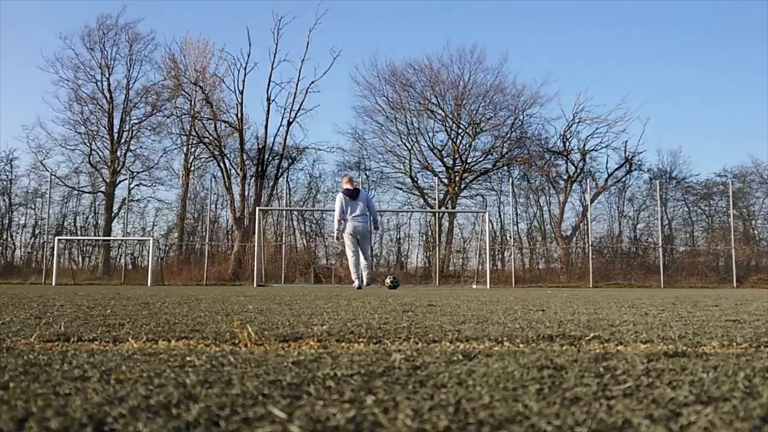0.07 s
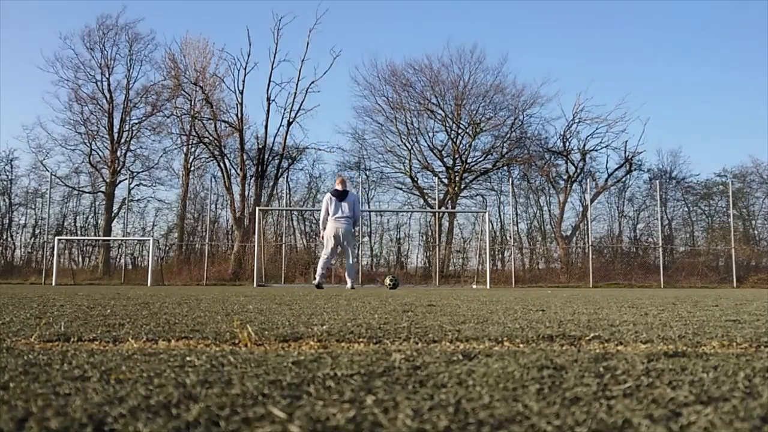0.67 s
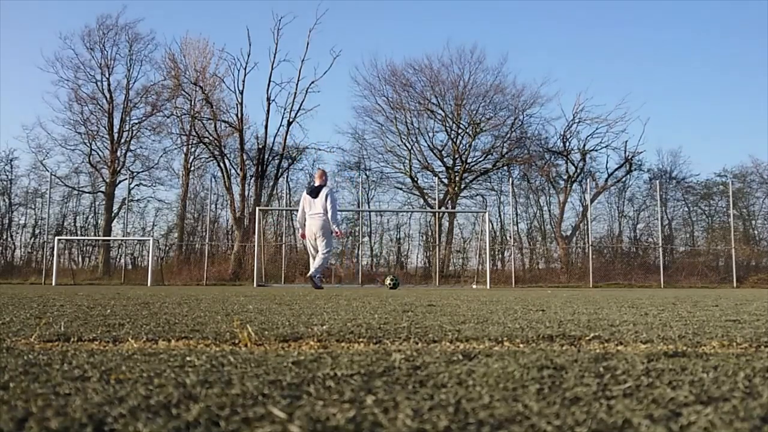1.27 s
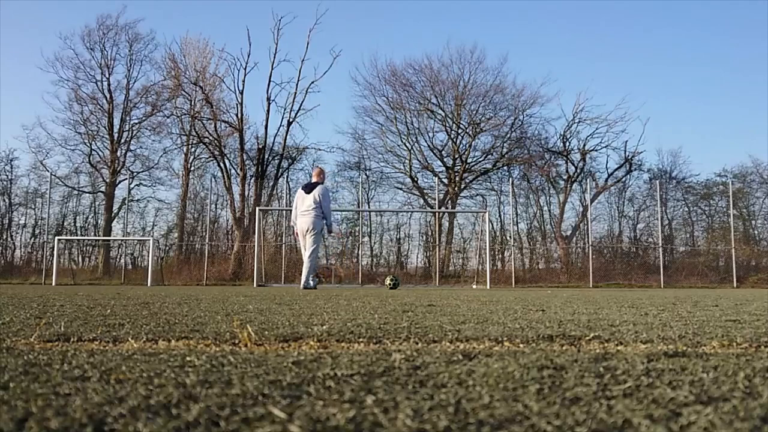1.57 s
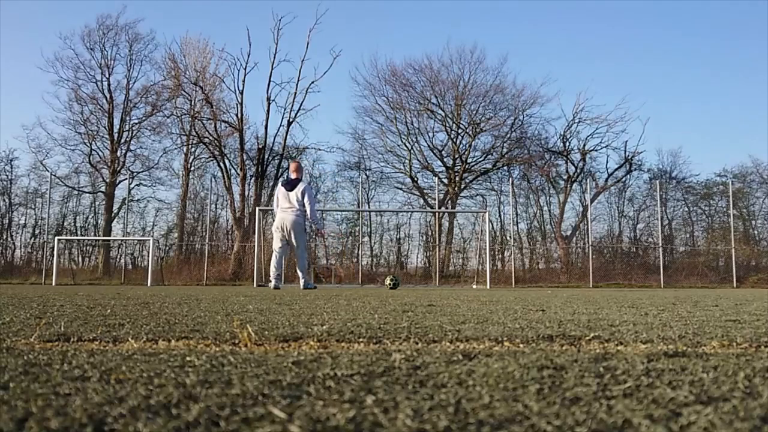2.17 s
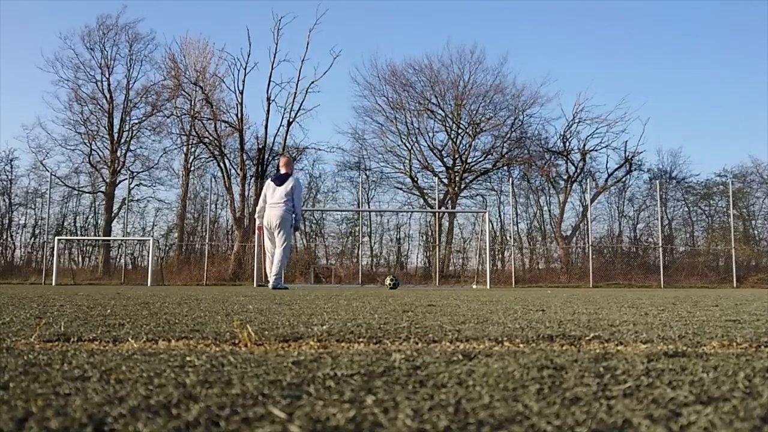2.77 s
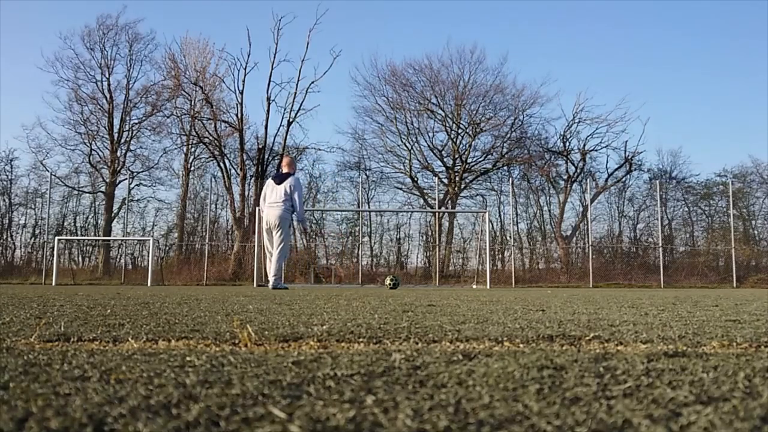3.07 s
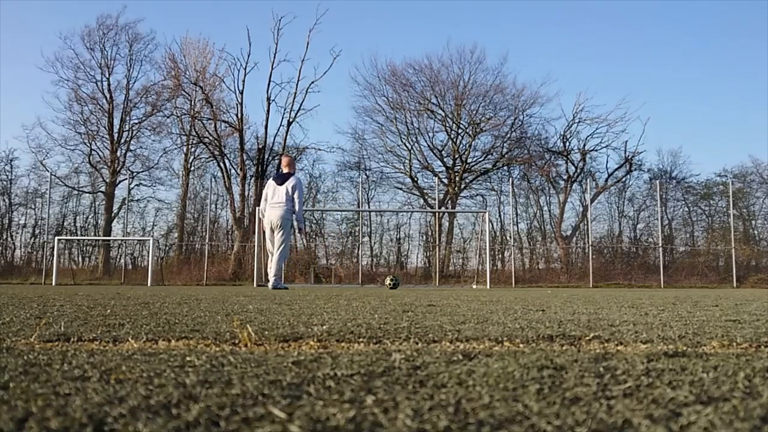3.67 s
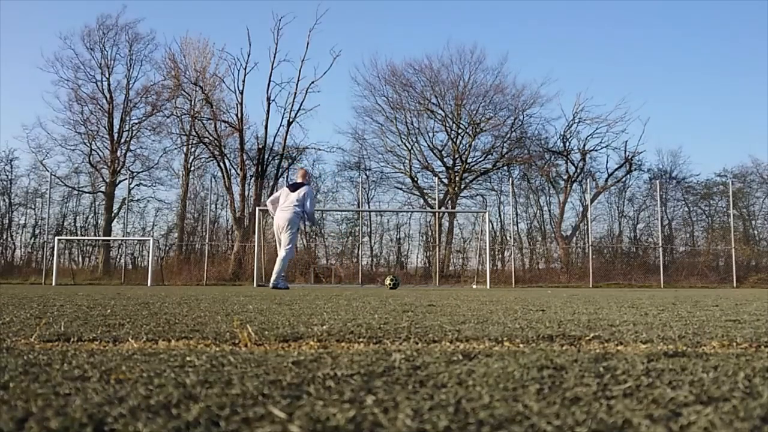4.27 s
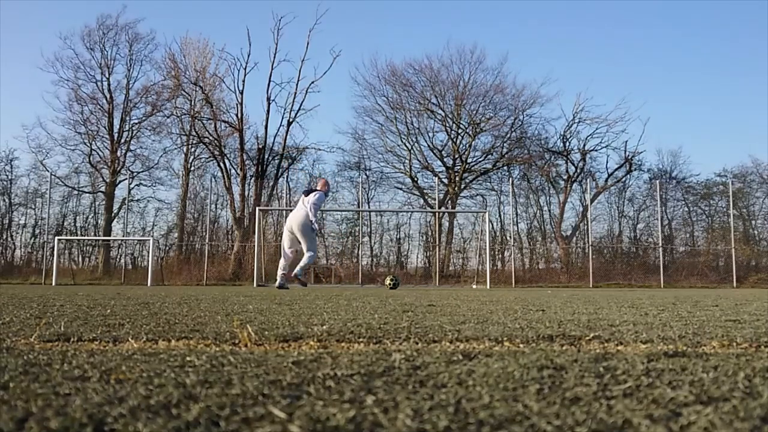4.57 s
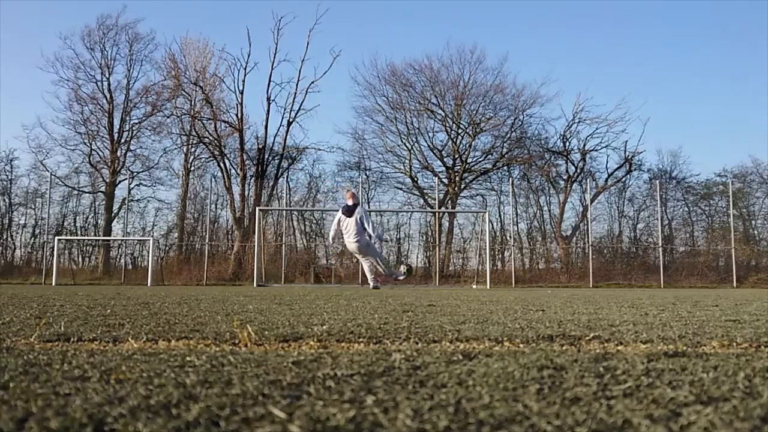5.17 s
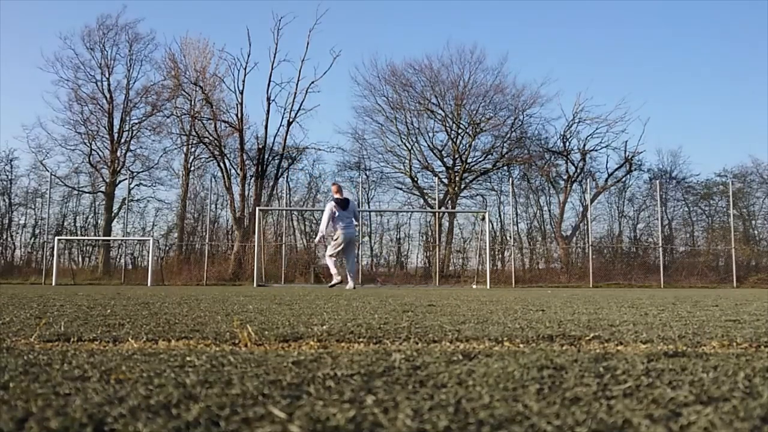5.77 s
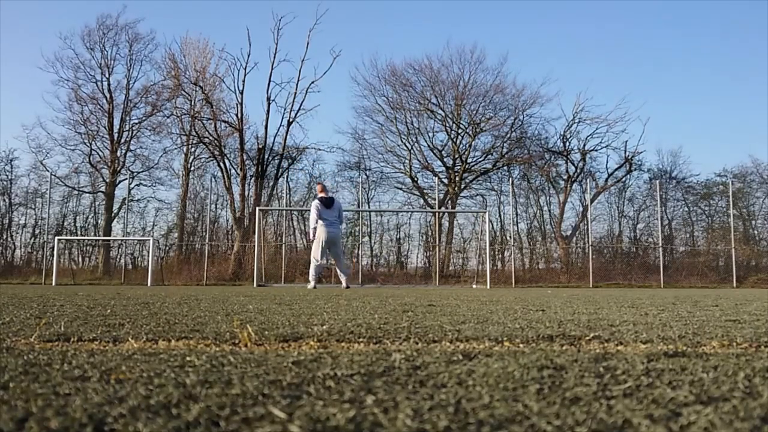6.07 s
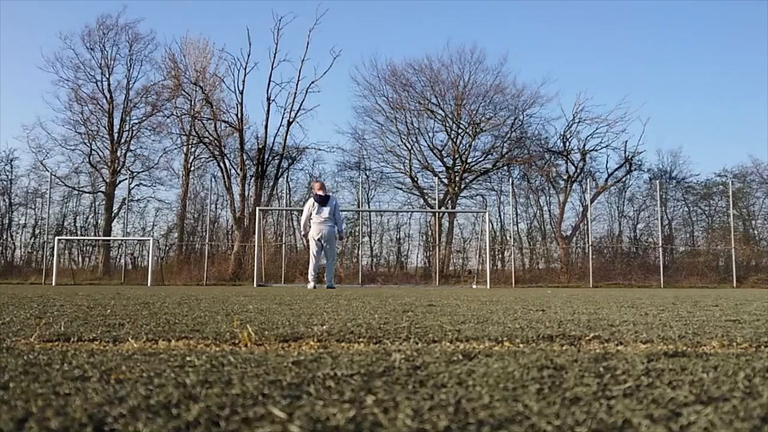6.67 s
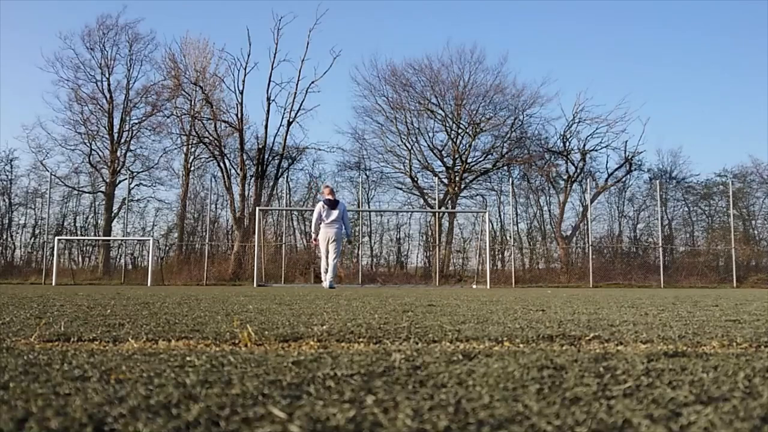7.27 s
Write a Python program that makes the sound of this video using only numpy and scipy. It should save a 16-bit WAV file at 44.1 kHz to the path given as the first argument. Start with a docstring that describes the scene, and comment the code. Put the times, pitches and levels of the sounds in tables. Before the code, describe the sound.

A low wind rumble on a microphone near the ground runs throughout, swelling in mild gusts over an open grass pitch. Behind it lie a soft distant rush and the faint hum and wavering whine of machinery. At about 2.9 seconds a football is kicked with a solid, slapping thump, the loudest sound, followed by a quick, quiet echo. A boot knocks softly on the turf at 3.2 seconds. Around 3.5 seconds the ball hits a wire fence with a double thud: the mesh rattles, the steel frame clanks and the taut wires ring for about half a second. Between 3.7 and 4.1 seconds a small bird very faintly whistles four high, falling notes. The ball drops and bounces softly at about 4.3, 4.8 and 5.2 seconds, each bounce weaker. Wind and distant machinery continue until the end, a little past 7 seconds.

```python
"""Wind rumbles on a camera low on a grass pitch, over a distant rush and the hum and whine of machinery.
A football is kicked: it flexes with a thump, its skin slaps, and the edge of the pitch throws it back.
A boot knocks on the turf, then the ball hits a wire fence, drops and bounces. The steel frame clanks,
the wire crossings rattle and the taut wires ring on, while a small bird whistles four falling notes."""
import sys
import numpy as np
from scipy import signal
from scipy.fft import rfft, irfft
from scipy.io import wavfile

SR = 44100
rng = np.random.default_rng(int(sys.argv[2]) if len(sys.argv) > 2 else 0)


def log_audio(samples):
    """Write samples as a 16-bit WAV file to the path given in sys.argv[1]."""
    # one column per channel
    frames = np.atleast_2d(samples).T
    # limit to full scale, then quantise
    limited = np.clip(frames, -1, 1)
    pcm = np.round(limited * 32767).astype(np.int16)
    wavfile.write(sys.argv[1], SR, pcm)


N = 323253
T = np.arange(N) / SR
HZ = np.fft.rfftfreq(N, 1 / SR)
PAN = np.array([[.5], [-.5]])  # splits a pan_db, left minus right, between the channels

# gusts on the microphone ports: start_s, level_db, length_s, pan_db
WIND_GUSTS = [(0, -52.5, 1.45, 3.5), (1.196, -50, 2.4, 0.5), (3.315, -54, 1.2, 2.5), (6.02, -56, 0.72, -23)]
# tone of the wind rumble: freq_hz, gain_db
WIND_EQ = [(22, -49), (32, -25.5), (45, -8), (60, 4), (85, -2), (120, -9), (200, -37.5), (400, -83.5)]
# tone of the distant rush: freq_hz, gain_db
RUSH_EQ = [(50, -26), (90, -13.5), (125, 3.5), (160, -1.5), (210, 2.5), (270, -4), (320, -4), (420, -8),
           (500, -8.5), (620, -10), (800, -18), (1150, -28), (1600, -38.5), (2400, -57)]
# stereo image of the rush: freq_hz, correlation
RUSH_IMAGE = [(60, 0.86), (130, 0.99), (290, 0.94), (640, 1), (1400, 0.49), (2400, 0.061)]
# drone of far-off machinery: pitch_hz, width_hz, level_db
HUM_BANDS = [(63.5, 4.4, -63), (299.6, 9.9, -66.5)]
# partials of the machine's whine: pitch_hz, gain_db
WHINE_PARTIALS = [(463, 2), (862, -14)]
# the air carries the whine over: peak_s, level_db, half_length_s
SWELLS = [(0.203, -69.5, 0.13), (1.47, -66.5, 0.15), (1.992, -67, 0.073), (4.203, -66, 0.62),
          (4.775, -63.5, 0.14), (5.883, -64, 0.28), (6.545, -70, 0.16)]
# balance of the two microphone ports: freq_hz, pan_db
PORT_PAN = [(60, -3), (110, -3.5), (200, -5), (700, -5), (1290, -7.5), (2380, -3.5), (4400, 2.45),
            (8000, -4), (14000, 2.83)]
# the tail of one bird note, then the four-note call: start_s, base_pitch_hz, slide_depth, bend, level_db
BIRD_NOTES = [(-.04, 6170, .27, 2, -76.5), (3.686, 7450, .19, 1, -69.5), (3.803, 7330, .25, 1.2, -71),
              (3.919, 7000, .28, 1.6, -71.5), (4.047, 6300, .28, 3.6, -75.5)]
# the ball on boot, fence and turf: start_s, level_db, contact_s, slap_db, scuff_db, crack_db
BALL_HITS = [(2.8635, .3, .00852, -5.5, -54, -47), (3.5098, -26, .0084, -7, -37, -29),
             (3.5638, -8.3, .0096, -16, -35, -38), (3.7064, -24, 0.0095, -25, -36, -34),
             (4.2552, -24.5, 0.01, -9.5, -41, -46), (4.8495, -28.5, .008, -13, -50, -50),
             (5.178, -33, .0062, -13, -50, -50)]
# tone of the ball's scuff: freq_hz, gain_db
SCUFF_EQ = [(300, 20), (1200, 8.5), (2500, -13), (4400, -2), (5500, -24), (9000, -12), (15000, -27)]
# tone of the skin's crack at first touch: freq_hz, gain_db
CRACK_EQ = [(600, 11.5), (1500, -3), (2600, -3.5), (4300, -8.5), (5400, -20), (12000, -18)]
# the kick returning from the edge of the pitch: delay_s, gain_db
KICK_ECHOES = [(0.1178, -20), (0.1329, -24)]
# tone of those echoes: freq_hz, gain_db
ECHO_EQ = [(50, -28), (100, -11), (155, 2), (260, -12), (600, -12.5), (1300, 11), (5000, -5)]
# three tiny ticks during the kick, then sharp snaps at the fence hits: start_s, level_db, fade_s
TICK_BURSTS = [(2.8683, -52, .0005), (2.8734, -54, .0007), (2.8763, -54, .0005), (3.51, -53, .0012),
               (3.5642, -43, .0012), (3.573, -45, .0012), (3.709, -55, .002)]
# tone of the ticks: freq_hz, gain_db
TICK_EQ = [(2000, -22.5), (4400, 8), (5600, -5), (8000, -2), (11500, -7.5), (15000, -16)]
# faint crackly rustles, the first with the kick's echo: start_s, level_db, fade_s
RUSTLE_BURSTS = [(2.975, -74.5, 0.14), (3.2, -85, 1), (3.85, -84, 0.66), (4.26, -79, 0.22),
                 (4.435, -82, 0.04), (4.85, -82, 0.075)]
# tone of the rustles: freq_hz, gain_db
RUSTLE_EQ = [(500, 1.5), (1200, 3.5), (2200, -7), (3500, -6.5), (4600, -3.5), (5400, -17), (7500, -13.5),
             (14000, -25)]
# a boot on the turf: start_s, level_db, pitch_hz
BOOT_KNOCKS = [(3.2318, -30, 380), (3.2803, -45, 533)]
# jolts of the fence: start_s, rattle_db, fade_s, jingle_db
FENCE_JOLTS = [(3.5099, -35, 0.002, -62), (3.515, -49, 0.03, -66), (3.5425, -39.5, 0.0051, -64),
               (3.555, -44, 0.0083, -67), (3.5622, -36, 0.004, -52), (3.5645, -35.5, 0.17, -60),
               (3.5728, -41, 0.0074, -48), (3.578, -50, .04, -49), (3.68, -54, .04, -58),
               (3.698, -48.5, .065, -75)]
# tone of the mesh rattle: freq_hz, gain_db
RATTLE_EQ = [(35, -43), (60, -1), (91, -1), (298, -13), (327, -18.5), (376, -9), (443, -14), (521, -18),
             (931, -20), (1200, -26), (1500, -26.5), (3840, -38), (4630, -37), (5320, -43), (7030, -45),
             (15500, -57)]
# stereo image of the rattle: freq_hz, correlation
RATTLE_IMAGE = [(130, 0.95), (640, 1), (1400, 0.71), (3100, 0), (7000, 0)]
# tone of the jingling wire crossings: freq_hz, gain_db
JINGLE_EQ = [(1500, -12), (3500, 4.5), (4500, 8), (5500, -11), (7000, -1), (8500, -7), (11500, -6),
             (13500, -21)]
# the ball drives the mesh against its frame: start_s, level_db
FRAME_HITS = [(3.51, -46), (3.5642, -40), (3.5728, -36), (3.601, -45), (3.648, -48), (3.7095, -48)]
# resonances of the steel frame: pitch_hz, gain_db, t60_s
FRAME_MODES = [(592, -5, .06), (1020, -2, .035), (1190, -1, .04), (1310, -9, .03), (1930, -15, .04),
               (4060, -18, .04), (4370, -13, .04), (4640, -17, .05)]
# the ball presses into the mesh, which then swings back: start_s, level_db
MESH_PUSHES = [(3.5635, -40), (3.695, -58)]
# resonances of the taut wires: pitch_hz, gain_db, t60_s
WIRE_MODES = [(296, 6, .3), (372, 0, .7), (383, -7, .7), (497, -9, 1.1), (533, 1, .5), (605, -7, .5),
              (635, -6, .45), (670, -8, .6), (694, -9, .5), (882, -14, .8), (912, -13, .7), (957, -10, .7),
              (1066, -12, .7), (1102, -10, .6), (1168, -10, .5), (1204, -10, .5), (1296, -13.5, .5),
              (1329, -13, .5), (1565, -19, .8), (1647, -20, .7), (1782, -21, .6), (1950, -16, .45),
              (2026, -20.5, .5), (2230, -19, .4), (2342, -23, .5), (2573, -20, .35), (2859, -25, .45),
              (3214, -26, .45), (3601, -25, .4), (4126, -21, .35), (4177, -22, .35), (4447, -23, .35),
              (4597, -21, .4)]
# loose wires as the fence settles: start_s, level_db, pitch_hz, width_hz, fade_s
WIRE_CLINKS = [(3.678, -60.5, 4710, 110, .035), (3.702, -51, 900, 40, .04), (3.762, -71, 4300, 120, .012),
               (3.765, -78, 4680, 110, .06), (3.801, -47, 382, 120, .01), (3.858, -72, 1572, 24, .065),
               (3.975, -83, 1572, 24, .05), (4.318, -89, 4480, 420, .04), (4.438, -82, 4660, 300, 0.03),
               (4.51, -86, 4520, 250, 0.031)]
# tone of the camera's hiss: freq_hz, gain_db
HISS_EQ = [(1200, -0.5), (2000, 3), (4400, 0.5), (5400, -11), (7000, -6.5), (10000, -0.5), (12600, 0.5),
           (13200, -18), (15500, -7)]


def undb(db):
    """Decibels to amplitude."""
    return 10 ** (np.asarray(db) / 20)


def unit(x):
    """Scale to rms 1."""
    return x / np.sqrt(np.mean(x ** 2))


def curve(points):
    """Join (freq_hz, value) points on a log-frequency axis."""
    hz, value = np.transpose(points)
    return np.interp(np.log(HZ + 1), np.log(hz), value)


def eq(x, points):
    """Filter by a (freq_hz, gain_db) curve."""
    return irfft(rfft(x) * undb(curve(points)), N)


def spread(pair, image):
    """Blend two unrelated signals into left and right, with the image's correlation at each frequency."""
    correlation = np.clip(curve(image), -1, 1)
    mid, side = rfft(pair) * np.sqrt([1 + correlation, 1 - correlation])
    return irfft(np.array([mid + side, mid - side]), N) / 2


def drift(rate_hz):
    """Smooth random modulation, rms 1."""
    return unit(irfft(rfft(rng.standard_normal(N)) * np.exp(-(HZ / rate_hz) ** 2), N))


def noise_band(hz, width_hz):
    """Noise ringing in one narrow resonance, rms 1."""
    return unit(irfft(rfft(rng.standard_normal(N)) / (1 + (2 * (HZ - hz) / width_hz) ** 2), N))


def since(start_s):
    """Time since the start, zero before it."""
    return np.maximum(T - start_s, 0)


def swell(t, rise_s, sharp):
    """Envelope that grows to 1 at the rise time, then dies away."""
    u = t / rise_s
    return (u * np.exp(1 - u)) ** sharp


def ping(t, hz, rise_s, sharp):
    """A heavily damped vibration of a few cycles."""
    return np.sin(2 * np.pi * hz * t) * swell(t, rise_s, sharp)


def bursts(rows, hold):
    """Envelope of hard attacks; a higher hold gives each a flatter top and a steeper fade."""
    return sum(undb(db) * np.minimum(since(start) / .00064, 1) * np.exp(-(since(start) / fade) ** hold)
               for start, db, fade in rows)


def clicks(per_s, scatter_db):
    """Two unrelated streams of tiny clicks of uneven size."""
    size = undb(scatter_db * np.minimum(rng.exponential(size=(2, N)), 4))
    polarity = rng.choice([-1, 1], (2, N))
    return unit(size * polarity * (rng.random((2, N)) < per_s / SR))


def wind(breeze_db=-52, breeze_pan_db=-8, wander_db=1.5, gust_rise_s=.034):
    """A near-steady breeze rumbles at the ports; gusts arrive quickly, hold and die away."""
    power = undb(breeze_db + .02 * T + wander_db * drift(2.8) + PAN * breeze_pan_db) ** 2
    for start, db, length, pan_db in WIND_GUSTS:
        t = since(start)
        gust = (1 - np.exp(-t / gust_rise_s)) * np.exp(-(t / length) ** 4)
        power = power + (undb(db + PAN * pan_db) * gust) ** 2
    noise = spread(rng.standard_normal((2, N)), image=[(40, .86), (100, .96)])
    return np.sqrt(power) * unit(eq(noise, WIND_EQ))


def air_lift(rest_db):
    """How many dB the whine rises above rest as the air carries it over."""
    power = sum((undb(db - rest_db) * np.exp(-((T - peak) / half_length) ** 2 / 2)) ** 2
                for peak, db, half_length in SWELLS)
    return 10 * np.log10(1 + power)


def machinery(whine_db):
    """Far-off machinery hums, and whines at a pitch that wavers a little in the moving air."""
    warped_time = np.cumsum(1 + .0039 * drift(14.3)) / SR
    gain = undb(whine_db + 2 * drift(11))
    whine = np.sqrt(2) * sum(undb(db) * np.sin(2 * np.pi * hz * warped_time) for hz, db in WHINE_PARTIALS)
    hum = sum(undb(db) * noise_band(hz, width) for hz, width, db in HUM_BANDS)
    return gain * whine + hum


def distant_bed(rush_db=-53.5, wander_db=.77, whine_rest_db=-73, rush_follow=.084):
    """A distant rush behind the machinery, lifting slightly whenever the air carries the whine over."""
    lift_db = air_lift(whine_rest_db)
    rush = unit(eq(spread(rng.standard_normal((2, N)), RUSH_IMAGE), RUSH_EQ))
    rush = rush * undb(rush_db + rush_follow * lift_db + wander_db * drift(4))
    left, right = ports(rush + machinery(whine_rest_db + lift_db))
    # it comes from the left, so it reaches the right port later
    return np.array([left, np.roll(right, 14)])


def ports(sound):
    """Most frequencies reach the right microphone port a little louder."""
    return irfft(rfft(sound) * undb(PAN * curve(PORT_PAN)), N)


def bird(note_s=.063, pan_db=-13, reverb_db=-4.5):
    """Thin whistles on the right hook up, slide down and drop at the end; bare trees scatter them."""
    song, waver, flutter = 0, drift(200), drift(90)
    for start, base_hz, depth, bend, db in BIRD_NOTES:
        progress = np.clip((T - start) / note_s, 0, 1)
        hook = .3 * np.exp(-progress / .05)
        slide = .57 * np.expm1(-bend * progress) / np.expm1(-bend)  # more bend levels off sooner
        drop = .55 * progress ** 8
        hz = base_hz * (1 - depth * (hook + slide + drop)) * (1 + .007 * waver)
        envelope = undb(db + 2 * flutter) * np.abs(4 * progress * (1 - progress)) ** (1 / 3)
        song = song + envelope * np.sin(2 * np.pi * np.cumsum(hz) / SR)
    trees = rng.standard_normal((2, SR // 2)) * np.exp(-T[:SR // 2] / .059)
    trees = trees / np.sqrt(np.sum(trees[0] ** 2))
    reverb = signal.fftconvolve(song[None], trees)[:, :N]
    return song * undb(PAN * pan_db) + undb(reverb_db) * reverb


def thump(start_s, db, contact_s, slap_db, scuff_db, crack_db, scuff_noise, crack_noise):
    """The ball flattens and springs back; its skin cracks, slaps, rings and slaps again on parting."""
    t = since(start_s)
    flex = ping(t, hz=.66 / contact_s, rise_s=.714 * contact_s, sharp=9)
    meeting = ping(t, hz=198, rise_s=.0015, sharp=5.1)
    parting = undb(-14.5) * ping(since(start_s + contact_s), hz=321, rise_s=.0029, sharp=17)
    skin = undb(-22.5) * ping(t, hz=590, rise_s=.0039, sharp=1.25)
    slap = undb(slap_db) * (skin - meeting - parting)
    # a small ball radiates little deep bass
    low_cut = signal.butter(3, 60, "high", fs=SR, output="sos")
    body = signal.sosfilt(low_cut, flex + slap + 1e-18)
    crack = undb(crack_db) * crack_noise * swell(t, rise_s=.0006, sharp=1)
    scuff = undb(scuff_db) * scuff_noise * swell(t, rise_s=.0038, sharp=.39)
    return undb(db) * (body + crack + scuff)


def ball():
    """Kick, fence hits and bounces; the pitch's edge echoes the kick, thinned of deep bass and slap."""
    scuff_noise = unit(eq(rng.standard_normal(N), SCUFF_EQ))
    crack_noise = unit(eq(rng.standard_normal(N), CRACK_EQ))
    hits = [thump(*hit, scuff_noise, crack_noise) for hit in BALL_HITS]
    far_kick = eq(hits[0], ECHO_EQ)
    return sum(hits) + sum(undb(db) * np.interp(T - delay, T, far_kick) for delay, db in KICK_ECHOES)


def ticks():
    """Tiny bright ticks sound during the kick; sharp snaps mark the fence hits."""
    return unit(eq(rng.standard_normal((2, N)), TICK_EQ)) * bursts(TICK_BURSTS, hold=2.01)


def rustles():
    """Faint crackly rustles come with the kick's echo and after the ball's bounces."""
    return unit(eq(clicks(per_s=3500, scatter_db=3), RUSTLE_EQ)) * bursts(RUSTLE_BURSTS, hold=1.1)


def boot():
    """A boot lands on the turf with short, hollow knocks."""
    return sum(undb(db) * ping(since(start), hz, rise_s=.0021, sharp=2.2) for start, db, hz in BOOT_KNOCKS)


def fence():
    """Each jolt sets the wire crossings clicking, a low rattle and a bright jingle over ringing wires."""
    rattle_envelope = bursts([(start, db, fade) for start, db, fade, _ in FENCE_JOLTS], hold=1.46)
    jingle_envelope = bursts([(start, db, fade) for start, _, fade, db in FENCE_JOLTS], hold=1.2)
    chatter = clicks(per_s=1400, scatter_db=1.8) * rattle_envelope
    makeup_gain = 1 / np.sqrt(np.mean(undb(curve(RATTLE_EQ)) ** 2))
    rattle = makeup_gain * eq(spread(chatter, RATTLE_IMAGE), RATTLE_EQ)
    jingle = eq(clicks(per_s=4200, scatter_db=.5) * jingle_envelope, JINGLE_EQ)
    return rattle + jingle + wire_ring()


def frame_clanks(dulling_per_octave=.83):
    """Each blow makes the steel frame clank; softer blows sound duller."""
    hardest_db = max(db for _, db in FRAME_HITS)
    clanks = 0
    for start, db in FRAME_HITS:
        t = since(start)
        tilt_db_per_octave = dulling_per_octave * (db - hardest_db)
        for hz, mode_db, t60 in FRAME_MODES:
            peak_db = db + mode_db + tilt_db_per_octave * np.log2(hz / 1000)
            clanks = clanks + undb(peak_db - 60 * t / t60) * np.sin(2 * np.pi * hz * t)
    return clanks


def wire_ring(build_s=.03, sway_db=2.5, pitch_bend=.004):
    """The ring builds at each push; every wire wavers in level and pitch as the mesh sways."""
    first_push_s = MESH_PUSHES[0][0]
    t, ring = T[:SR], 0
    pushes = [(np.maximum(t + first_push_s - start, 0), db) for start, db in MESH_PUSHES]
    for hz, mode_db, t60 in WIRE_MODES:
        envelope = sum(undb(db - 60 * age / t60) * (1 - np.exp(-age / build_s)) for age, db in pushes)
        sway, strain = (np.interp(t, np.linspace(0, 1, 40), rng.standard_normal(40)) for _ in range(2))
        cycles = hz * np.cumsum(1 + pitch_bend * strain) / SR
        # high wires reach the two ports out of step
        phase = rng.random() + min(hz / 1500, 1) * rng.uniform(-.25, .25, (2, 1))
        ring = ring + envelope * undb(mode_db + sway_db * sway) * np.sin(2 * np.pi * (cycles + phase))
    return np.array([np.interp(T - first_push_s, t, side, left=0, right=0) for side in ring])


def clinks():
    """Loose wires buzz briefly against their neighbours, at an unsteady pitch."""
    buzz = 0
    for start, db, hz, width, fade in WIRE_CLINKS:
        cycles = np.cumsum(hz + width / 2 * drift(width)) / SR
        buzz = buzz + np.sqrt(2) * np.sin(2 * np.pi * cycles) * bursts([(start, db, fade)], hold=1.6)
    return buzz


def scene():
    """Wind and the distant bed, with the shot, the fence and the bird on top."""
    ambience = wind() + distant_bed()
    action = ball() + ticks() + boot() + fence() + frame_clanks() + clinks() + rustles() + bird()
    return ambience + ports(action)


def record(dry):
    """The camera adds its own faint hiss and cuts the top above 15.7 kHz."""
    hiss = undb(-82.5) * unit(eq(rng.standard_normal((2, N)), HISS_EQ))
    high_cut = signal.ellip(8, .2, 70, 15700, fs=SR, output="sos")
    return signal.sosfilt(high_cut, dry + hiss)


dry = scene()
out = record(dry)
log_audio(out)
```